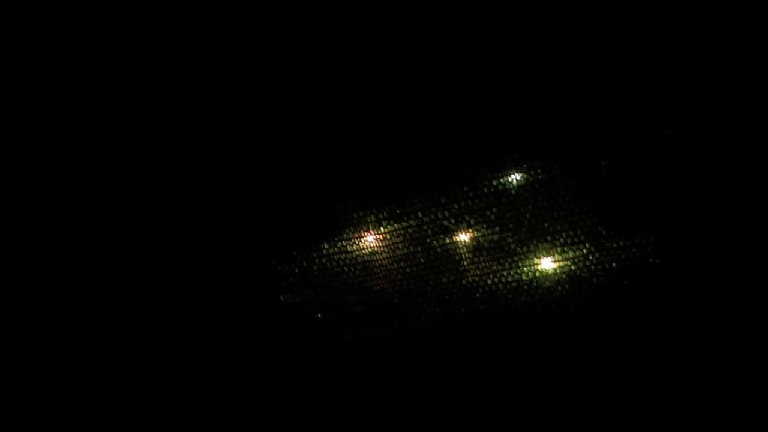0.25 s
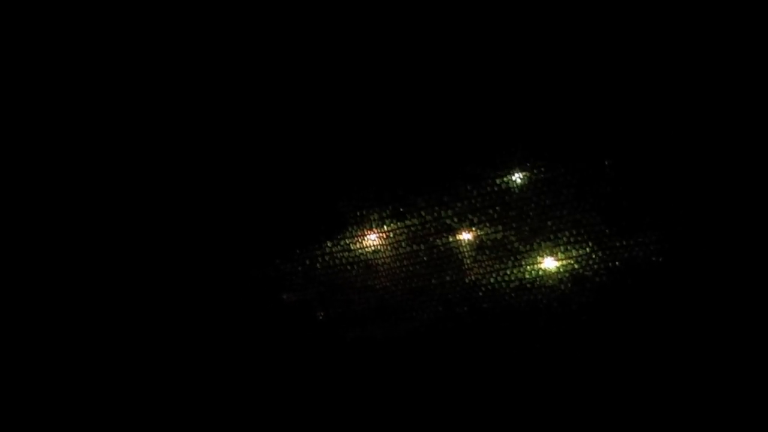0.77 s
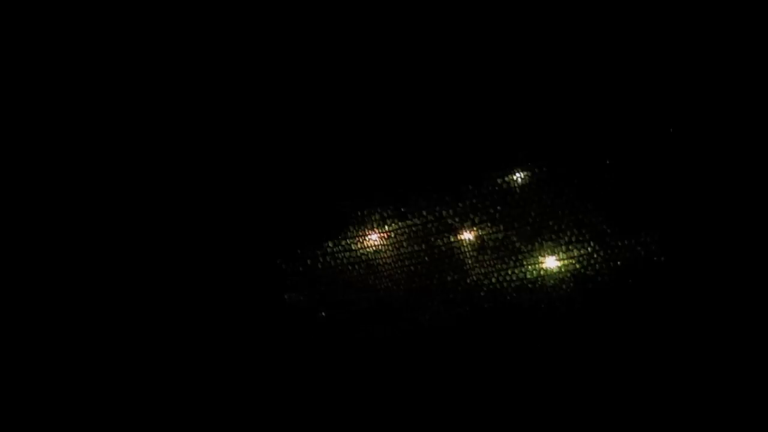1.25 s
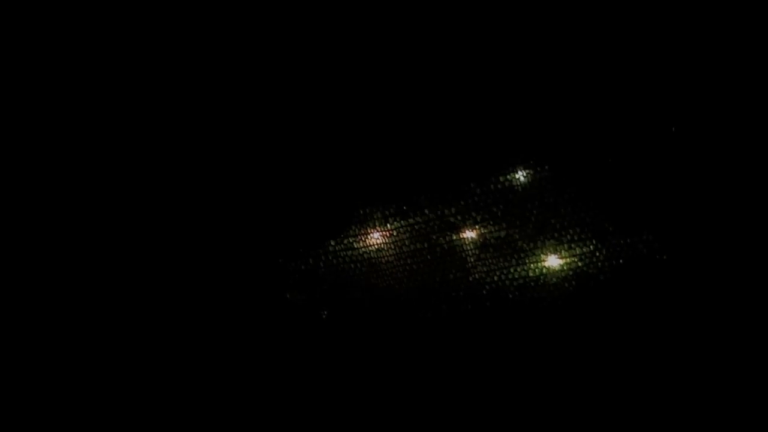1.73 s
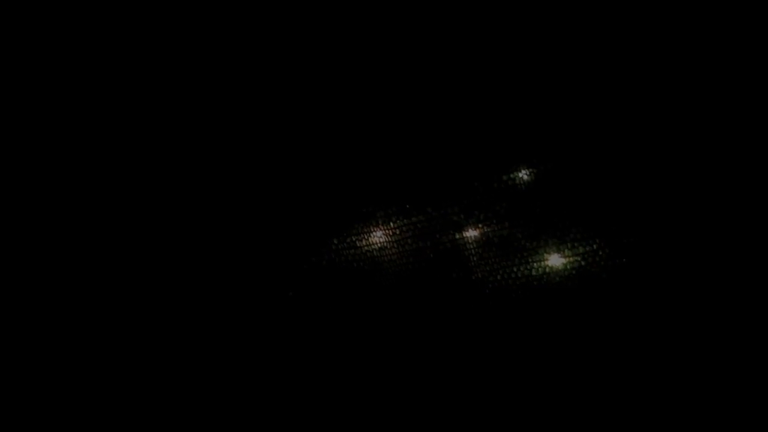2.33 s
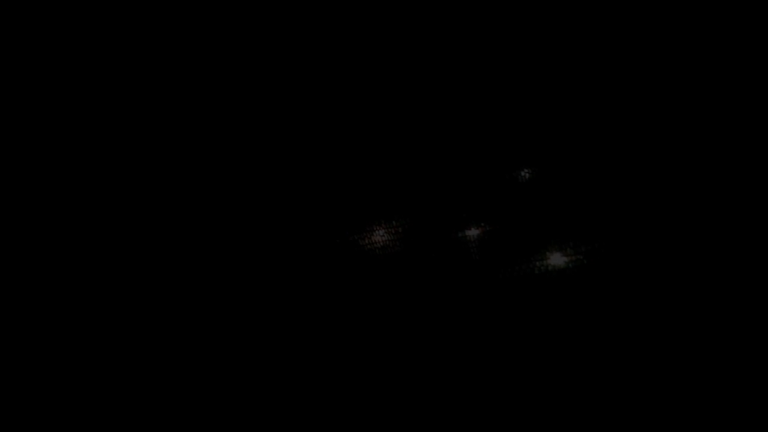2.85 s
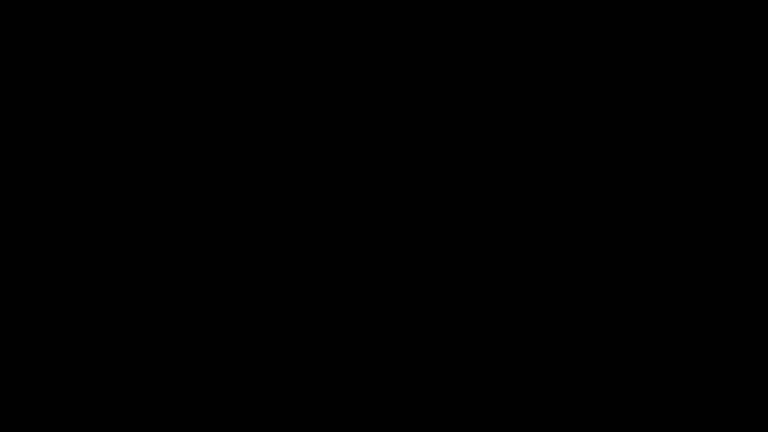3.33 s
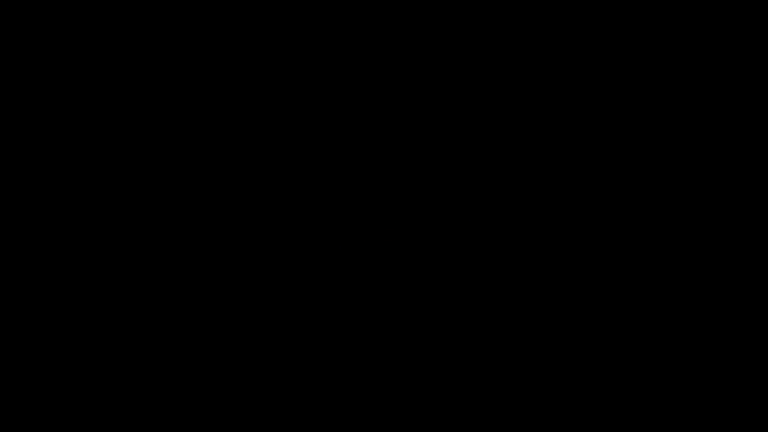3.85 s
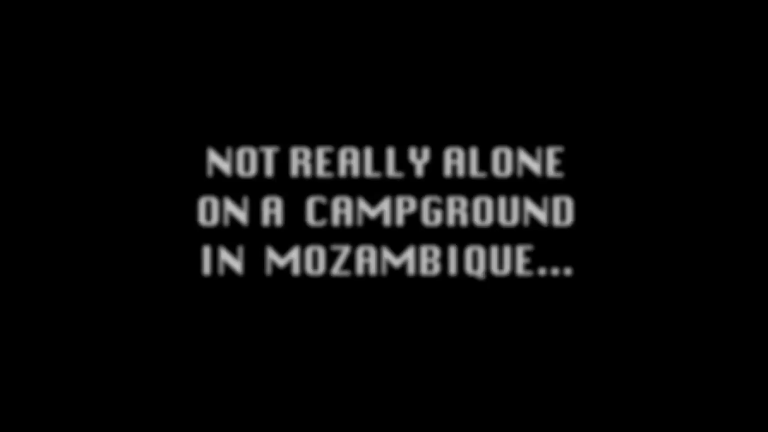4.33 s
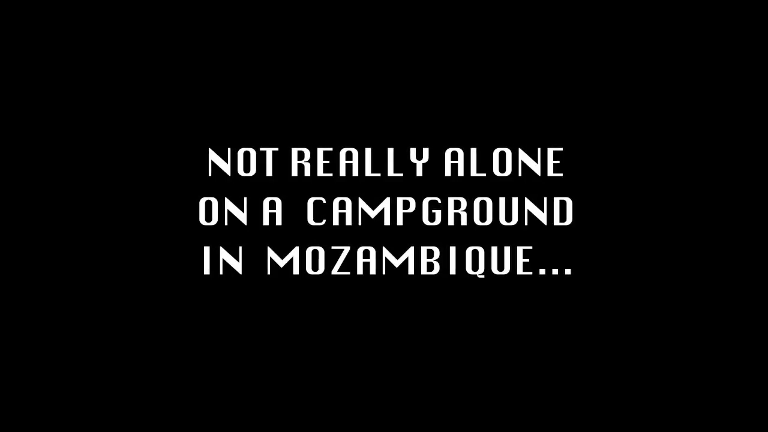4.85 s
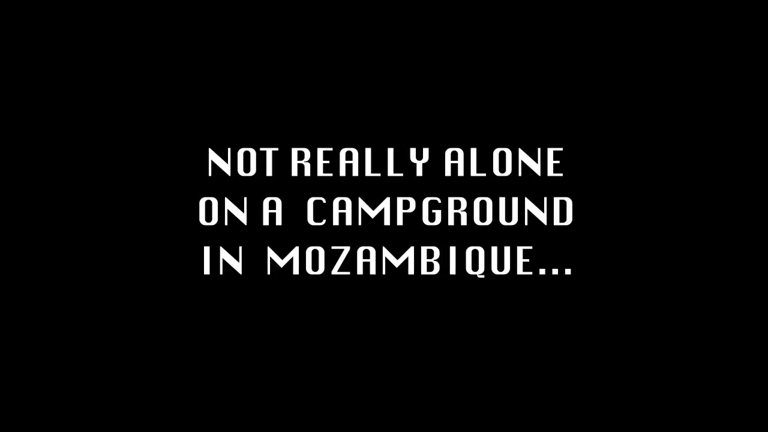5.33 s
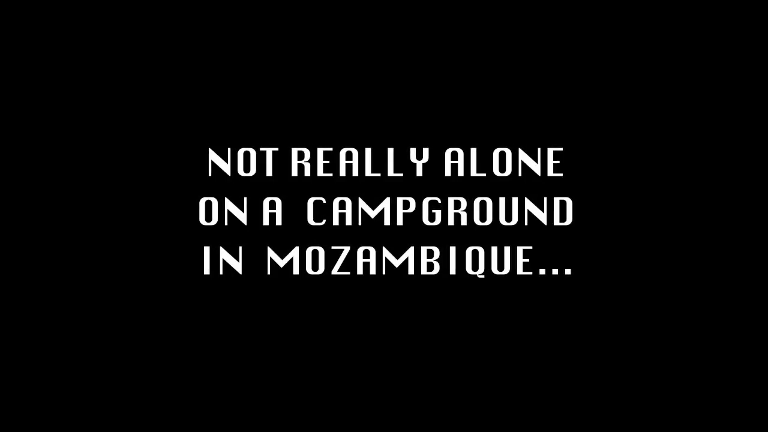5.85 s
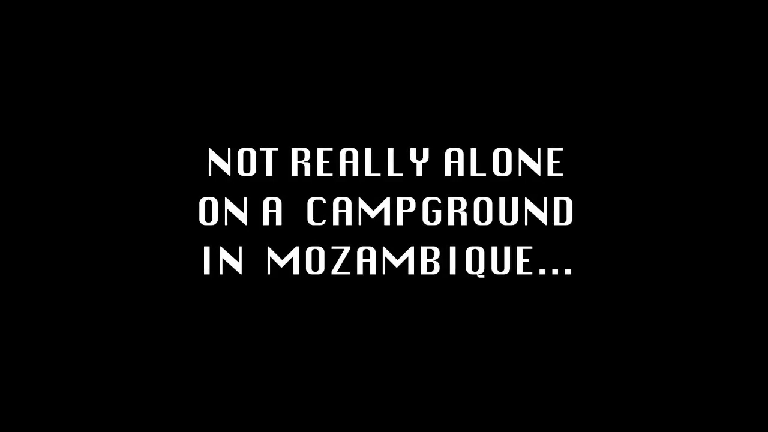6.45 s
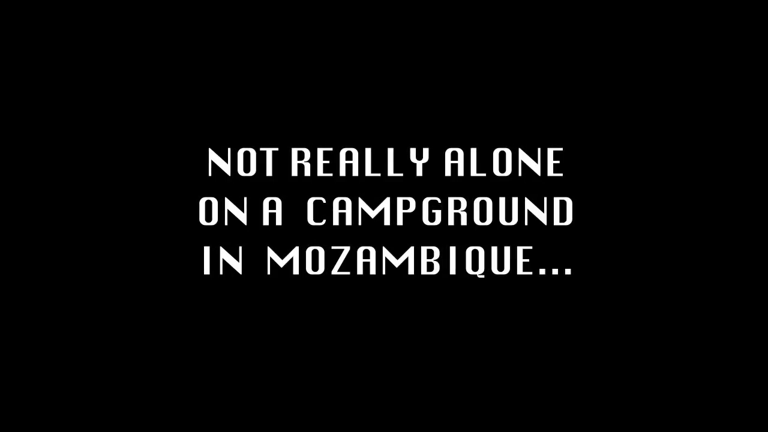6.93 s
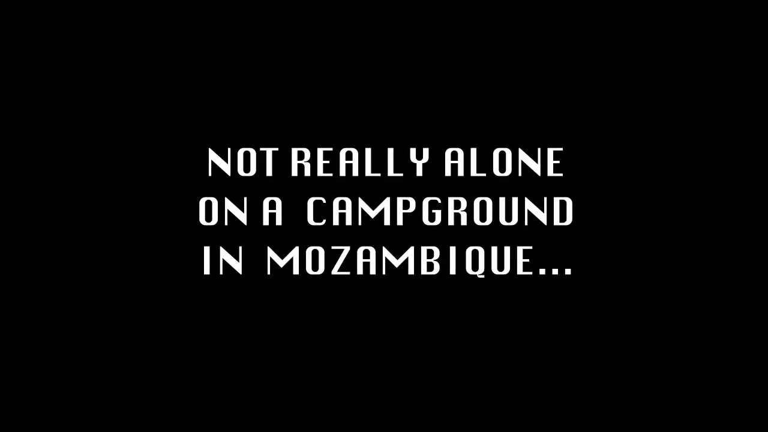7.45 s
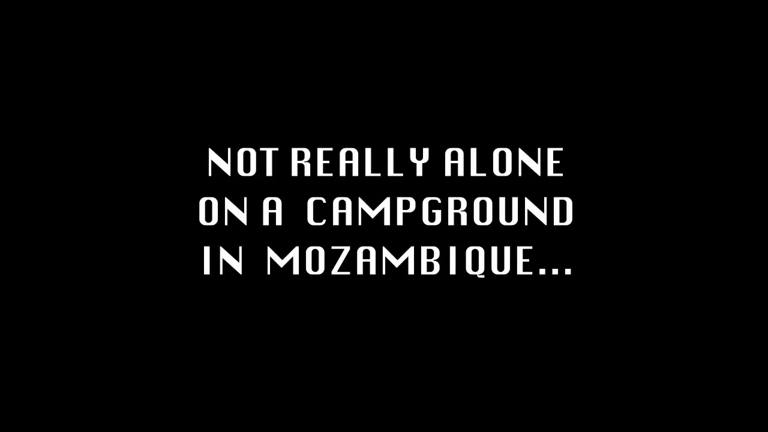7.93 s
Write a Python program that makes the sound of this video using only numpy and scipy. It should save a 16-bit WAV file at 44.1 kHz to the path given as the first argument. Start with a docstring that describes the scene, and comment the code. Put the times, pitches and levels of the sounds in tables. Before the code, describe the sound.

Inside a tent at night, microphone close under the cloth. Dense rain patters and big drops snap sharply overhead, each bursting into fine spray. The shower gradually thins, with a few heavy thuds pushing the fabric around the middle. Behind it lie rain on the ground and a soft surf-like rumble. Near the end only stray drops remain while crickets chirp and a distant wash rises.

```python
"""Night rain on a tent

Heard from inside, the microphone close under the cloth, as a shower thins out towards the end.
Each drop snaps the taut cloth and scatters into spray; the heaviest push a whole panel.
Outside: rain on the ground, a low rumble like distant surf, a far wash that rises late,
and crickets, near and far, that come through as the rain eases."""
import sys
import numpy as np
from scipy import signal
from scipy.fft import rfft, irfft, next_fast_len
from scipy.io import wavfile
from scipy.ndimage import uniform_filter1d

SR = 44100
rng = np.random.default_rng(int(sys.argv[2]) if len(sys.argv) > 2 else 0)


def log_audio(samples):
    """Write samples as a 16-bit WAV file to the path given in sys.argv[1]."""
    # one column per channel
    frames = np.atleast_2d(samples).T
    # limit to full scale, then quantise
    limited = np.clip(frames, -1, 1)
    pcm = np.round(limited * 32767).astype(np.int16)
    wavfile.write(sys.argv[1], SR, pcm)


N = 360738
TIME = np.arange(N) / SR


def undb(db):
    """Decibels to gain."""
    return 10 ** (np.asarray(db) / 20)


def unit(x):
    """Scale each row to an rms of 1."""
    return x / np.sqrt(np.mean(x ** 2, axis=-1, keepdims=True))


def curve(table):
    """Rows of (time [s], value) joined by straight lines."""
    return np.interp(TIME, *np.transpose(table))


def walk(rate):
    """Slow chance: random levels, `rate` per second, joined smoothly, with a spread of about 0.6."""
    step = int(SR / rate)
    levels = np.repeat(rng.standard_normal(N // step + 1), step)
    return 0.77 * uniform_filter1d(levels, step)[:N]


def noise(spectrum, side_db, grain_db=0, wide_hz=2200):
    """Stereo noise of a given colour, narrowing above wide_hz; grain_db scatters the size of its clicks."""
    size = next_fast_len(N, real=True)
    hz, db = np.transpose(spectrum)
    bins = np.fft.rfftfreq(size, 1 / SR) + 1  # +1 keeps the logarithm finite
    gain = undb(np.interp(np.log(bins), np.log(hz), db))
    grain = undb(grain_db * np.clip(rng.standard_normal(size), -3, 3))
    clicks = rng.standard_normal((2, size)) * grain
    mid, side = rfft(clicks) * gain
    side = side * undb(side_db) / (1 + (bins / wide_hz) ** 2)
    return unit(irfft([mid + side, mid - side], size)[:, :N])


def place(times, shapes):
    """Sum short waveforms, one per row, at their start times."""
    starts = (np.maximum(times, 0) * SR).astype(int)
    index = starts[:, None] + np.arange(shapes.shape[1])
    return np.bincount(index.ravel(), shapes.ravel(), N)[:N]


# colour of the night around the tent: (frequency [Hz], density [dB])
NIGHT_COLOUR = [(25, -13), (100, -13), (200, 1), (380, -12), (720, -10), (1100, -22), (1950, -7.5),
                (3000, -5.5), (5000, -13), (9000, -17), (15000, -58)]


def night_air():
    """The quiet bed of the night, nearly central: coloured noise with a slightly wandering level."""
    return noise(NIGHT_COLOUR, side_db=-26.5) * undb(-44.5 + .5 * walk(5.5))


# colour of the far wash: (frequency [Hz], density [dB])
WASH_COLOUR = [(25, -9), (70, -11), (130, -17), (210, 3.5), (380, -9), (570, -4), (750, -3.5), (1100, -5),
               (2000, -7.5), (5000, -52)]
# its late rise: (time [s], level [dB])
WASH_RISE = [(0, -63), (6.4, -53), (7.6, -41.5), (8.18, -40.5)]


def far_wash():
    """A far wash: coloured noise that rises late."""
    return noise(WASH_COLOUR, side_db=-9.0) * undb(curve(WASH_RISE))


# colour of the rumble: (frequency [Hz], density [dB])
RUMBLE_COLOUR = [(20, -37), (50, -17), (75, -5), (98, 0), (150, -1), (220, -9), (350, -9.5), (700, -34.5),
                 (2000, -40.5)]
# its swell, before RUMBLE_DB is added: (time [s], level [dB])
RUMBLE_SWELL = [(0.0, -45.5), (0.73, -42.5), (2.8, -49.5), (3.53, -42), (4.99, -41.5), (5.4, -47),
                (5.76, -42.5), (6.7, -47), (7.08, -45), (8.18, -44)]
RUMBLE_DB = 3


def low_rumble():
    """Low noise like distant surf, swelling and ebbing with a small random wander."""
    return noise(RUMBLE_COLOUR, side_db=-17) * undb(curve(RUMBLE_SWELL) + RUMBLE_DB + 1.2 * walk(5.6))


def chorus(hz=4580, width_hz=160, db=-55):
    """Far crickets merge into a thin, wavering band."""
    edges_hz = [hz - width_hz / 2, hz + width_hz / 2]
    band = signal.butter(2, edges_hz, "bandpass", fs=SR, output="sos")
    return unit(signal.sosfilt(band, rng.standard_normal(N))) * undb(db + 2 * walk(9.6))


# chirps of the nearest crickets: (time [s], pitch [Hz], typical peak of a stroke [dB])
CRICKET_CHIRPS = [(6.896, 4620, -44), (7.297, 4590, -42), (7.727, 4560, -37), (7.921, 4460, -45),
                  (8.121, 4580, -38)]
STROKE_GAP_S = 0.043  # from one wing stroke to the next


def crickets(count=4, stroke_s=0.0251, sag_hz=150):
    """A chirp is four evenly spaced wing strokes, each a near-pure tone that sags as the wing slows."""
    times, hz, db = np.transpose(CRICKET_CHIRPS)
    progress = np.linspace(0, 1, int(stroke_s * SR))
    pitch_hz = hz[:, None] - sag_hz * (progress - .5)
    phase = 2 * np.pi * np.cumsum(pitch_hz, axis=1) / SR
    stroke = np.sin(np.pi * progress) * np.sin(phase)
    sizes = undb(db + 1.2 * rng.standard_normal((count, len(db))))
    return sum(place(times + k * STROKE_GAP_S - stroke_s / 2, sizes[k][:, None] * stroke)
               for k in range(count))


# colour of rain landing outside the tent: (frequency [Hz], density [dB])
GROUND_COLOUR = [(100, -19.5), (400, -4.5), (750, -4.5), (1100, -1.5), (2000, 1), (3000, -1.5), (5000, -4),
                 (8000, -10), (12000, -20), (16000, -22)]
GROUND_DB = -2  # relative to the shower


def ground_rain(shower_db):
    """Rain on the ground outside: grainy noise that follows the shower, its level flickering."""
    flicker_db = 1.2 * walk(25)
    return noise(GROUND_COLOUR, side_db=-5.5, grain_db=7.0) * undb(shower_db + GROUND_DB + flicker_db)


def snaps(hz, ring_db, contact=0.28, spread=0.47, fall=1.58, ring_cycles=1.8):
    """Pressure under each drop, rms 1: the spreading dent slides down in pitch; wet patches ring."""
    stretch, life, detune, phase = rng.standard_normal((len(hz), 4)).T[:, :, None]
    t = np.arange(SR // 200) / SR
    cycles = hz[:, None] * t
    age = cycles / (contact * np.exp(0.2 * stretch))
    radius = 1 + age * spread
    onset = 1 - np.exp(-(age / 0.82) ** 2)
    dent = np.sin(np.pi * np.log(radius) / spread) * onset / radius ** fall
    ring_age = cycles / (ring_cycles * np.exp(0.17 * life))
    ring_tone = np.sin(2 * np.pi * (cycles * np.exp(0.087 * detune) + phase))
    ring = ring_tone * ring_age * np.exp(1 - ring_age)
    mix = unit(dent) + undb(ring_db)[:, None] * unit(ring)
    return unit(mix * (1 - t / t[-1]))


def ticks(hz, tick_hz=4800, life_cycles=0.48):
    """First contact of each drop, rms 1: a click of about one cycle, usually above the snap's pitch."""
    pitch, life = rng.standard_normal((len(hz), 2)).T[:, :, None]
    own_hz = tick_hz * np.sqrt(hz[:, None] / np.median(hz)) * np.exp(.12 * pitch)
    own_hz = np.minimum(own_hz, SR / 7)
    cycles = own_hz * np.arange(SR // 200) / SR
    age = cycles / (life_cycles * np.exp(0.34 * life))
    return unit(np.sin(2 * np.pi * cycles) * age * np.exp(-age))


def fade(energy, t60):
    """Let deposits of energy die away by 60 dB in t60 seconds; each starts at its own height."""
    return signal.lfilter([1], [1, -np.exp(-2 * np.log(1000) / (t60 * SR))], energy)


def spray(times, db, burst_t60, tail_t60, tail_db):
    """Envelope of the splashes: drops burst, some wetter than others, and droplets fall back in a tail."""
    splash_db = db + 2 * rng.standard_normal(len(db))
    energy = place(times + .0004, undb(2 * splash_db)[:, None])
    burst, tail = fade(energy, burst_t60), fade(energy, tail_t60)
    return np.sqrt(burst + undb(2 * tail_db) * tail + 1e-18)


# colour of the coarse spray: (frequency [Hz], density [dB])
SPRAY_COLOUR = [(100, -25), (300, -3.5), (720, -4.5), (1100, -0.5), (2300, -1.5), (3500, -6), (5000, -9.5),
                (8000, -23.5), (16000, -40)]
# colour of the fine mist: (frequency [Hz], density [dB])
MIST_COLOUR = [(1000, -28), (2500, -4), (4500, 0.5), (7500, -5.5), (12000, -16.5), (16000, -15)]


def strike(times, db, hz, treble_db, ring_db, snap_db, tick_db, spray_db, mist_db):
    """Drops on the tent: tick and snap, an echo off the opposite wall, then coarse spray and fine mist."""
    pan, distance = rng.uniform(-1.2, 1, (len(times), 2)).T
    snap = snaps(hz, ring_db) * undb(db + snap_db)[:, None]
    hit = snap + ticks(hz) * undb(db + treble_db + tick_db)[:, None]
    direct = np.array([place(times, hit * undb(side * (2.0 * pan - .2))[:, None]) for side in (1, -1)])
    # the echo comes in from the side and reaches one microphone port first
    echo_times = times + .0032 + 0.0016 * distance
    echo = np.array([place(echo_times + side * .0002 * pan, hit) for side in (1, -1)])
    coarse = spray(times, db + spray_db, burst_t60=0.028, tail_t60=0.026, tail_db=-9)
    coarse = coarse * noise(SPRAY_COLOUR, side_db=-9.0, grain_db=2.0)
    fine = spray(times, db + treble_db + mist_db, burst_t60=0.023, tail_t60=0.064, tail_db=-5)
    fine = fine * noise(MIST_COLOUR, side_db=-42, grain_db=6)
    return direct + undb(-20.0) * echo + coarse + fine


PATTER_DB = 0.9  # relative to the shower


def patter(shower_db, count=1400, scatter_db=5.5, largest=2.03, centre_hz=2550):
    """Many smaller drops all over the tent follow the shower; higher snaps tend to carry more treble."""
    times = rng.uniform(0, N / SR, count)
    size, tone, edge, wetness = rng.standard_normal((count, 4)).T
    db = np.interp(times, TIME, shower_db + PATTER_DB) + scatter_db * np.minimum(size, largest)
    hz = centre_hz * np.exp(0.4 * tone)
    treble_db = -11 + 2 * tone + 6.3 * edge
    ring_db = -6 + 7 * wetness
    return strike(times, db, hz, treble_db, ring_db,
                  snap_db=-5.5, tick_db=-13.5, spray_db=-8.0, mist_db=-4.0)


# heavy drops on a panel: (time [s], push level [dB], canvas knock level [dB], left minus right [dB])
PANEL_THUMPS = [(1.858, -25, -25, -9), (2.646, -27, -45, 5), (4.279, -18, -8, -2), (5.101, -30, -21, 13),
                (5.303, -13.5, -19, -6.5)]
# what a struck panel knocks with: (frequency [Hz], level [dB], decay time constant [s])
PANEL_MODES = [(375, 1.5, 0.0027), (660, -3, 0.0012), (1070, -5, 0.0011)]


def thumps(push_s=0.0023, relax_s=0.018):
    """A heavy drop shoves a panel inward, and it eases back with a dull knock."""
    times, push_db, knock_db, pan_db = np.transpose(PANEL_THUMPS)
    t = np.arange(SR // 5) / SR
    shove = (t / push_s) * np.exp(1 - t / push_s)
    push = shove * np.cos(2 * np.pi * 28 * t) * np.exp(-t / relax_s)
    # neighbouring modes start in opposite directions
    knock = sum((-1) ** k * undb(db) * np.sin(2 * np.pi * hz * t) * np.exp(-t / decay_s)
                for k, (hz, db, decay_s) in enumerate(PANEL_MODES))
    blow = undb(knock_db)[:, None] * knock - undb(push_db)[:, None] * push
    return np.array([place(times, blow * undb(side * pan_db / 2)[:, None]) for side in (1, -1)])


# the loudest drops, close overhead:
# (time [s], relative level [dB], pitch of the snap [Hz], treble relative to that level [dB])
OVERHEAD_DROPS = [(0.016, -2.5, 2220, -25), (0.034, 1, 1980, -22), (0.055, -1, 2860, -23),
                  (0.101, -1.5, 3130, -21), (0.12, 1, 1730, -22), (0.131, 0, 3780, -13),
                  (0.173, 2.5, 2820, -30), (0.179, 0, 2180, -27), (0.215, -3, 1740, -19.5),
                  (0.253, -3.5, 1730, -23), (0.275, -0.5, 2270, -23), (0.291, -3, 1700, -21),
                  (0.302, 1.5, 2100, -20), (0.399, 0.5, 3960, -15.5), (0.479, -2.5, 2750, -17),
                  (0.531, -4.5, 4020, -18), (0.565, -1.5, 2400, -20), (0.576, -0.5, 2740, -31),
                  (0.614, -2, 3320, -21), (0.693, 3.5, 1830, -29), (0.747, -1.5, 4640, -25),
                  (0.751, -1.5, 2540, -32), (0.789, -1.5, 3660, -28), (0.803, -3.5, 2340, -30),
                  (0.857, -7, 4130, -25), (0.872, -1.5, 2450, -26), (0.884, -1.5, 3100, -20),
                  (0.985, 3, 2450, -23), (0.998, 0.5, 1900, -32), (1.077, -1.5, 2400, -27),
                  (1.249, 3.5, 2470, -28), (1.305, -4, 1980, -22), (1.329, -5.5, 2600, -22),
                  (1.461, -4, 2470, -23), (1.504, -2, 2600, -31), (1.55, -3.5, 1780, -42),
                  (1.58, -7, 3030, -29), (1.622, -3, 1720, -23), (1.663, -4.5, 2160, -30),
                  (1.699, -3.5, 2050, -35), (1.835, -2, 4450, -26), (1.856, -0.5, 2270, -16.5),
                  (1.867, -3, 1940, -28), (1.9, -2.5, 2070, -28), (1.929, -7, 1870, -15),
                  (1.971, -2.5, 2700, -28), (2.06, -7, 2100, -27), (2.135, -0.5, 2650, -28),
                  (2.19, -5, 1710, -17), (2.375, -3, 2300, -24), (2.463, -7.5, 2110, -30),
                  (2.646, -7.5, 2340, -21), (2.902, -9, 2090, -15.5), (3.392, -4.5, 2040, -30),
                  (3.613, -9, 1870, -16), (3.909, -7.5, 1770, -33), (3.937, -3.5, 2630, -27),
                  (4.037, -5, 2100, -22), (4.184, -5, 2420, -24), (4.219, -5.5, 2290, -23),
                  (4.278, 3, 2150, -24), (4.436, -1.5, 1880, -40), (4.515, -0.5, 2830, -36),
                  (4.597, -3, 2150, -27), (4.631, -6.5, 3080, -28), (4.76, 1.5, 1780, -20.5),
                  (4.772, -5.5, 2140, -22), (4.894, -6.5, 2090, -19), (4.98, -5.5, 2100, -29),
                  (5.068, -5, 2880, -30), (5.099, 3.5, 2100, -24), (5.244, -8.5, 3060, -28),
                  (5.303, 7, 2840, -17), (5.356, -6, 2760, -28), (5.405, -13.5, 2100, -16),
                  (5.554, -17, 5590, -12), (5.792, -7, 5150, -37), (5.834, -9.5, 2700, -18),
                  (6.014, -5.5, 2280, -27), (6.294, -9, 2950, -23.5), (6.408, -5.5, 2100, -24),
                  (6.579, -11, 2050, -17.5), (7.125, -17, 1760, -25), (7.174, -12, 1920, -38),
                  (7.401, -15, 1880, -22)]
# wet cloth rings: more so under high snaps, less under a sharp dry tick
RING_DB, RING_DB_PER_OCTAVE, RING_DB_PER_TREBLE_DB = -3.5, 17, -0.6
GIVE_S = 0.000993  # the cloth gives under a big drop before it snaps


def close_drops():
    """The big drops right over the microphone: the cloth gives, then snaps, rings and sprays."""
    times, db, hz, treble_db = np.transpose(OVERHEAD_DROPS)
    octaves = np.log2(hz / np.median(hz))
    sharpness_db = treble_db - np.median(treble_db)
    ring_db = RING_DB + RING_DB_PER_OCTAVE * octaves + RING_DB_PER_TREBLE_DB * sharpness_db
    return strike(times + GIVE_S, db, hz, treble_db, ring_db,
                  snap_db=-18.0, tick_db=-3.0, spray_db=-15.0, mist_db=-0.6)


# strength of the shower, shared by patter and ground rain: (time [s], level [dB])
SHOWER_STRENGTH = [(0.0, -25.5), (0.34, -26.5), (0.8, -24.5), (1.96, -29), (2.09, -30), (3.55, -34),
                   (4.15, -33), (5.24, -33.5), (5.38, -37), (6.13, -33.5), (7.45, -44), (8.18, -53)]


def scene():
    """Drops on the cloth, over the wash of rain outside and the sounds of the night."""
    shower_db = curve(SHOWER_STRENGTH)
    night = night_air() + far_wash() + low_rumble() + chorus() + crickets()
    tent = patter(shower_db) + thumps() + close_drops()
    return night + ground_rain(shower_db) + tent


# resonances and notches of the small microphone housing: (frequency [Hz], width [Hz], gain [dB])
MICROPHONE_HOUSING = [(561, 34, 4), (761, 134, 4.5), (935, 490, -3), (1577, 41, 4), (1593, 94, -10.5),
                      (1710, 67, 1.5)]
TOP_HZ = 16000


def record(dry):
    """The housing colours the sound, peaks beyond 0.88 overload the recorder, and the top is cut."""
    x = signal.sosfilt(signal.butter(1, 12, "highpass", fs=SR, output="sos"), dry)
    for hz, width, db in MICROPHONE_HOUSING:
        band = signal.lfilter(*signal.iirpeak(hz, hz / width, fs=SR), x)
        x = x + (undb(db) - 1) * band
    top_cut = signal.ellip(10, .1, 70, TOP_HZ, fs=SR, output="sos")
    return signal.sosfilt(top_cut, np.clip(x, -.88, .88))


dry = scene()
out = record(dry)
log_audio(out)
```